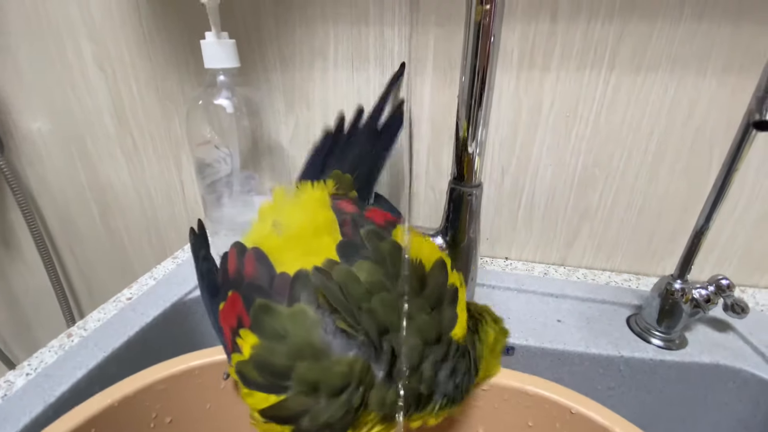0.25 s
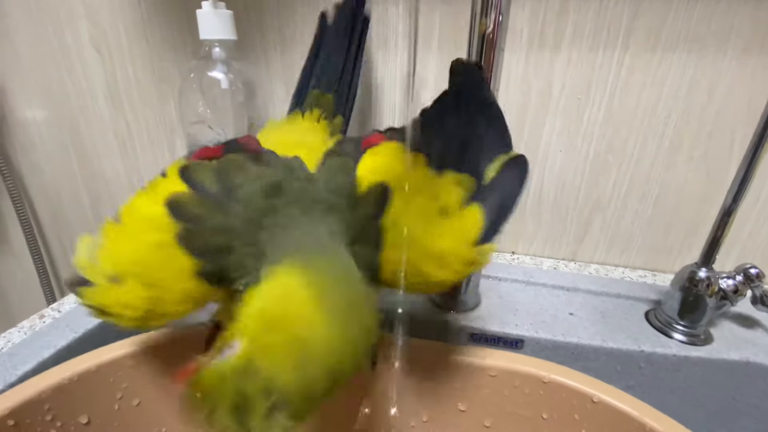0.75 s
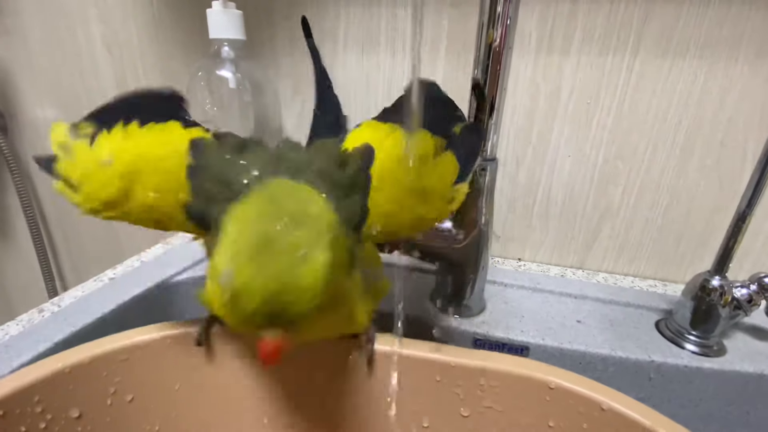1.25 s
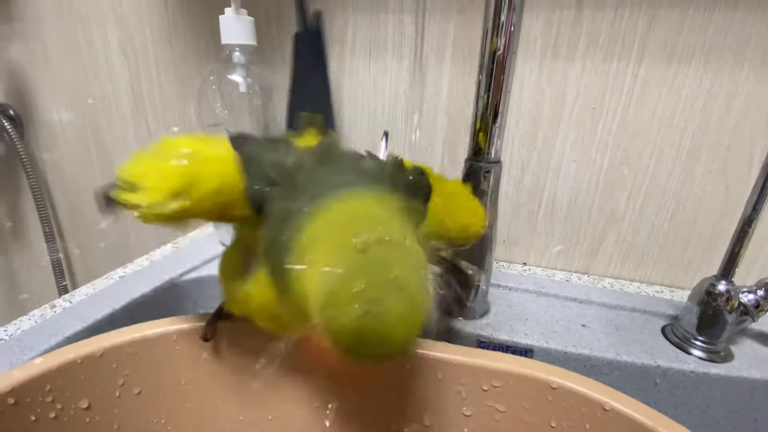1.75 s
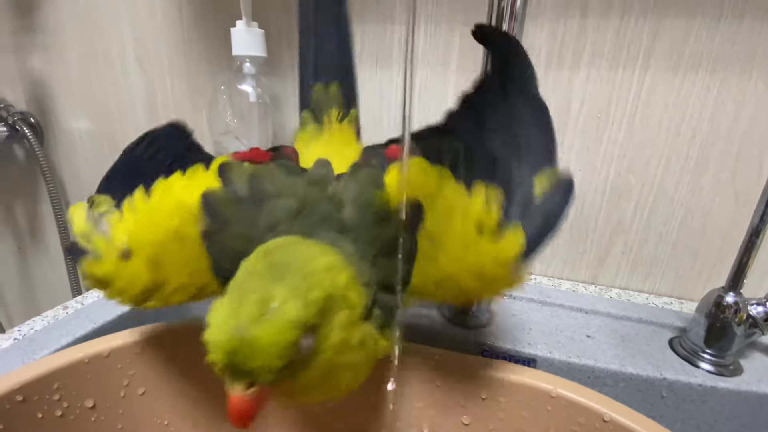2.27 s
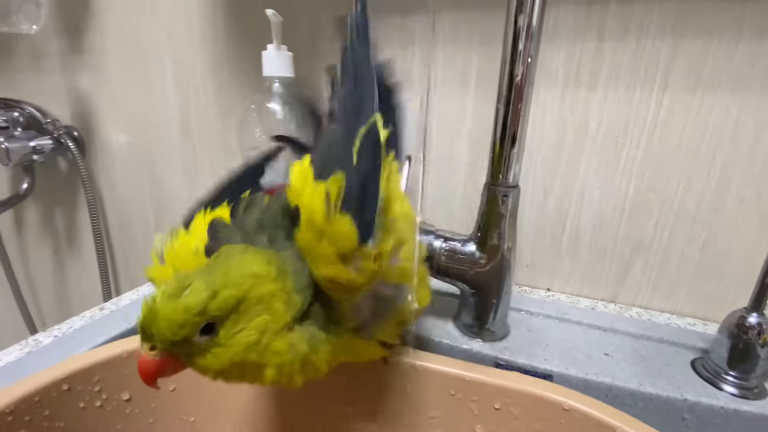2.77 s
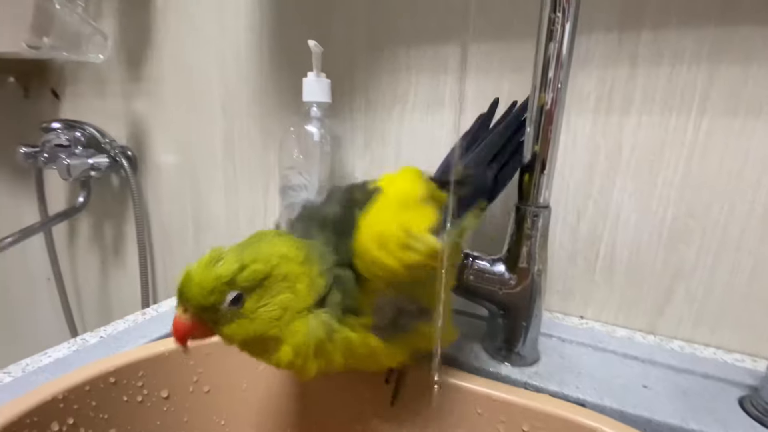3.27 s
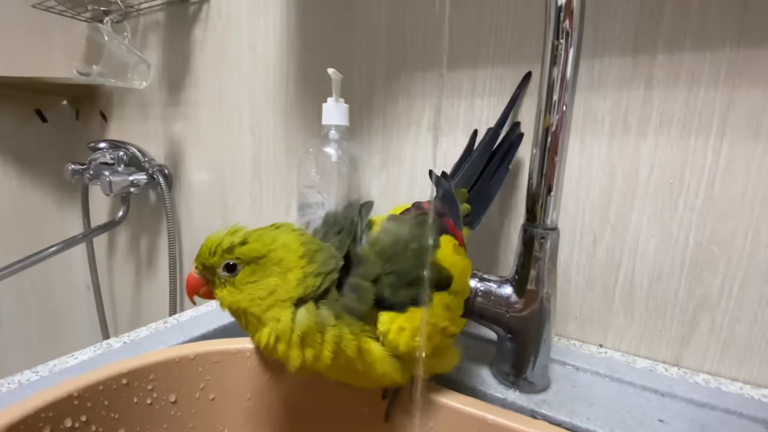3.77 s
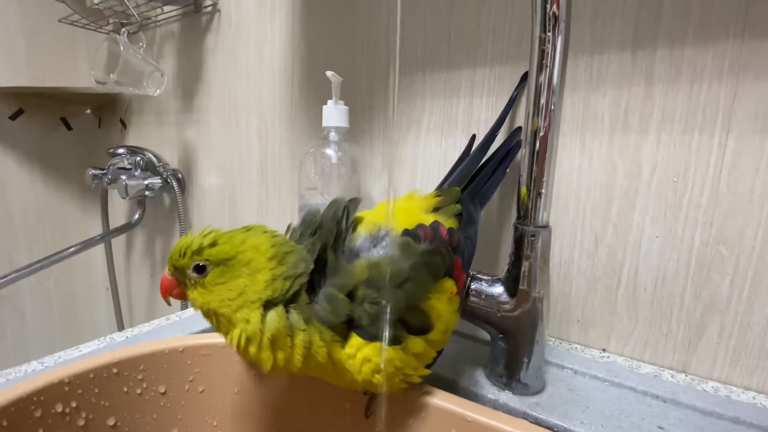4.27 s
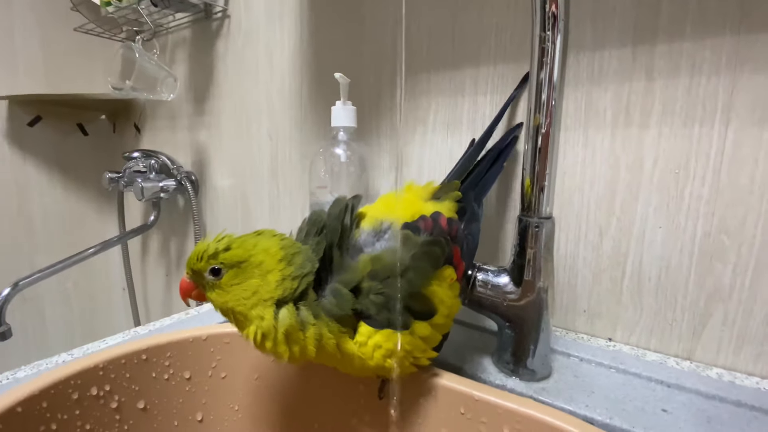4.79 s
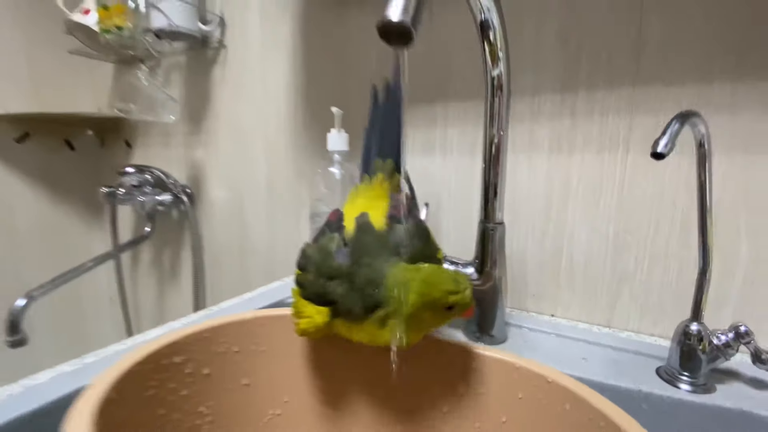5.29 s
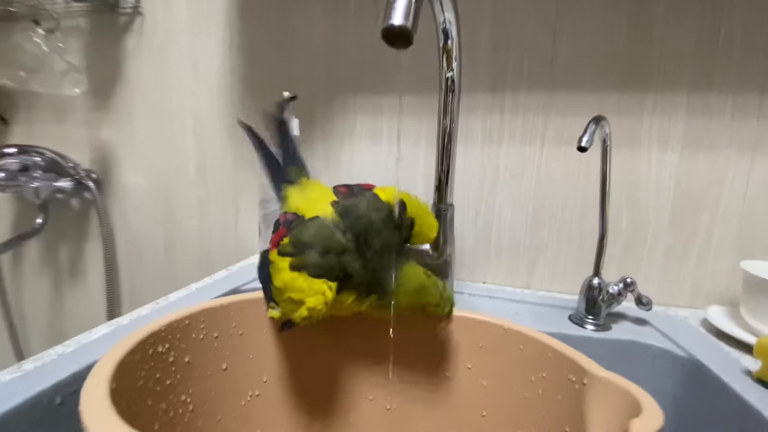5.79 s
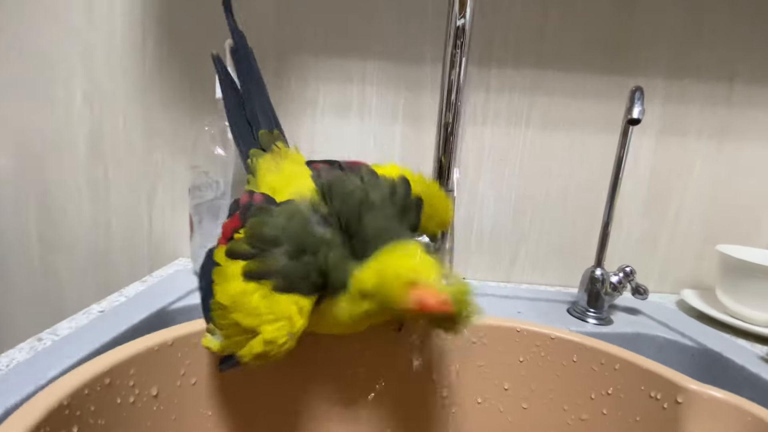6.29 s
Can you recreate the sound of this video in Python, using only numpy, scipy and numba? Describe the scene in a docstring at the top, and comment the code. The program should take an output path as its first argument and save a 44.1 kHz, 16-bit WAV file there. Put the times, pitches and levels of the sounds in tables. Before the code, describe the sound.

Close, uneven trickling and plopping of water falling off a bathing bird into a plastic bucket in a kitchen sink.

```python
"""In a kitchen sink, a thin tap stream breaks on a bathing bird and drips into a plastic bucket.
Each impact on the water radiates a tick; trapped air bubbles ring as damped oscillators whose pitch
climbs as they near the surface. Heavy drops excite the modes of the bucket wall, and fine spray
patters between them over the resonant hum of the sink. The sound is heard from close by at two
ports, left and right, with a short echo from the tiles and a soft room background."""
import sys
import numpy as np
from scipy import signal
from scipy.fft import rfft, irfft
from scipy.io import wavfile
from scipy.ndimage import uniform_filter1d, map_coordinates
from numba import njit

SR = 44100
rng = np.random.default_rng(int(sys.argv[2]) if len(sys.argv) > 2 else 0)


def digitize_waveform(pressure):
    """Quantize a signal to 16-bit integers and store it at the path in sys.argv[1].

    Rows of a 2-D input are taken as channels; values are limited to [-1, 1].
    """
    field = np.atleast_2d(pressure).T
    bounded = np.clip(field, -1, 1)
    quanta = np.round(bounded * 32767).astype(np.int16)
    wavfile.write(sys.argv[1], SR, quanta)


N = 288414

# Spectral density of the room background: f/Hz, relative level/dB
ROOM_SPECTRUM = [(30, -26), (52, 15.5), (343, -5.5), (665, -5.5), (11000, -17), (15500, -10.5),
                 (16800, -38)]
# Resonances of the sink, lowest first: f/Hz, bandwidth/Hz, relative level/dB
SINK_MODES = [(62, 27.5, -0.5), (141, 37, -23.5), (233.5, 24, -34.5), (357.3, 106, -25.5)]
# Envelope of the lowest sink resonance: t/s, level/dB
HUM_ENVELOPE = [(0.0, -54.5), (3.24, -54), (6.54, -66)]
# Envelopes of the small drops: t/s, relative gurgle level/dB, relative patter level/dB
SPRAY_ENVELOPES = [(0.0, -26, -50.5), (0.29, -47, -51.5), (0.6, -35.5, -45), (0.84, -56.5, -60.5),
                   (1.0, -36, -47.5), (1.15, -53.5, -62), (1.36, -56, -59.5), (1.56, -46.5, -44.5),
                   (1.78, -56.5, -62), (2.2, -60, -59.5), (2.5, -36, -45.5), (2.89, -60, -53.5),
                   (3.24, -36.5, -46.5), (3.56, -46.5, -60.5), (3.82, -40.5, -48.5), (4.22, -38, -42.5),
                   (4.62, -46.5, -62.5), (5.05, -47.5, -47.5), (5.4, -57.5, -62), (5.55, -42.5, -51),
                   (5.85, -35.5, -48), (6.03, -52.5, -61), (6.2, -55.5, -54), (6.35, -57.5, -57.5)]
# Large bubbles floating up: t/s, peak level/dB, first f/Hz, last f/Hz, duration/s
RISING_BUBBLES = [(0.032, -28, 973, 2420, 0.017), (0.065, -24.5, 910, 2272, 0.013),
                  (0.175, -36.5, 1310, 2140, 0.013), (0.226, -33.5, 1120, 2040, 0.0116),
                  (0.302, -32.5, 716.4, 2203, 0.0099), (0.424, -38.5, 1280, 2940, 0.015),
                  (0.465, -33.5, 714.5, 1422, 0.016), (0.598, -32, 792, 1470, 0.027),
                  (1.397, -36, 585, 1430, 0.033), (1.435, -30.5, 1160, 2208, 0.0084),
                  (1.473, -36, 705, 1420, 0.014), (1.491, -28, 1272, 2386, 0.0083),
                  (1.524, -38, 890, 1274, 0.026), (1.602, -28, 1061, 2586, 0.0077),
                  (1.688, -39.5, 1087, 1724, 0.034), (3.023, -33, 1200, 2210, 0.0069),
                  (3.09, -24.5, 1160, 2640, 0.024), (3.334, -37, 1327, 2062, 0.011),
                  (3.4, -29, 1011, 1997, 0.0075), (3.834, -32, 1028, 1870, 0.011),
                  (3.991, -34, 914, 1940, 0.01566), (4.147, -25.5, 797, 2378, 0.013),
                  (4.621, -36, 1260, 2940, 0.0094), (4.73, -25, 1770, 2700, 0.015),
                  (4.912, -35, 2660, 3580, 0.009), (5.477, -32.5, 1533, 2430, 0.0033),
                  (5.65, -38.5, 638.6, 1357, 0.046), (6.154, -39, 550, 1420, 0.018)]
# Drops striking the water: t/s, crack level/dB, body level relative to the crack/dB
SURFACE_IMPACTS = [(0.0712, -21, -7.5), (0.246, -30, 7), (0.3267, -17, -14.5), (0.547, -29.5, 5),
                   (0.574, -23.5, -33), (0.624, -34.5, 17.5), (0.652, -37.5, 18), (0.6974, -14.5, -32),
                   (0.889, -16, -13), (0.943, -36, 4.5), (0.967, -27.5, -8.5), (1.035, -22.5, -28),
                   (1.5403, -30, 9), (1.5718, -17.5, -35), (2.2105, -29, -3), (2.286, -22, -9),
                   (2.309, -17, -43), (2.395, -23, -27), (2.6438, -20, -4), (2.6984, -16.5, -4.5),
                   (2.805, -19.5, -6.5), (2.916, -20, 2), (2.988, -23.5, -30), (3.038, -17.5, -12),
                   (3.089, -14.5, -10), (3.2644, -7.5, -22.5), (3.335, -29, -2), (3.4122, -20, -8),
                   (3.489, -25, -18), (3.526, -22, 4), (3.5726, -24, -5.5), (3.6065, -22.5, -6),
                   (3.6511, -17.5, -49), (3.715, -22, 1.5), (3.7945, -15.5, -5.5), (3.86, -39, 20),
                   (3.98, -25.5, 0), (4.0254, -34, 13), (4.245, -38, -1), (4.395, -20.5, -7),
                   (4.4762, -24, -37), (4.5029, -23, -1.5), (4.575, -16.5, -6), (4.646, -22.5, -8),
                   (4.749, -23.5, -8), (4.759, -17, -40), (4.784, -12.5, -36.5), (4.8567, -9, -21),
                   (4.882, -20, -29), (4.95, -32.5, 18.5), (4.995, -39.5, 17), (5.053, -18.5, -32),
                   (5.1709, -18, -5.5), (5.2144, -28, -14), (5.256, -29, -23.5), (5.505, -21, -5),
                   (5.597, -41, 14.5), (5.658, -25.5, -3), (5.7198, -33, 7), (6.121, -28, -39),
                   (6.141, -17.5, -48), (6.1996, -12.5, -6.5), (6.249, -32, 4.5)]
# Bubbles trapped by drops: t/s, peak level/dB, starting f/Hz, rise/(octaves per decay time)
TRAPPED_BUBBLES = [(0.0819, -29.5, 1150, 0.28), (0.0854, -30, 790, 0.3), (0.1352, -16.5, 1238, 0.95),
                   (0.137, -25.5, 3490, 0), (0.2126, -21, 1354, 0.39), (0.3281, -18, 3540, 0.22),
                   (0.366, -24, 1867, 0.22), (0.3741, -20.5, 2930, 0.42), (0.512, -21.5, 1496, 0.12),
                   (0.6289, -20, 3260, 0.14), (0.719, -22, 785, 0.72), (0.7366, -22, 1137, 0.17),
                   (0.8933, -22, 3240, 0.25), (0.997, -20.5, 1380, 0.33), (1.441, -22.5, 2155, 1),
                   (1.502, -28.5, 687, 0.055), (1.5426, -28, 4140, 0.53), (1.568, -17.5, 1295, 0.098),
                   (1.6162, -17, 2770, 0.165), (1.615, -17.5, 4450, 0), (1.6721, -17, 1116, 0.027),
                   (2.356, -27.5, 3192, 0.0092), (2.4, -20.5, 1884, 0.054), (2.458, -30, 1920, 0),
                   (2.49, -28, 1467, 0.85), (2.705, -33.5, 643, 0.16), (2.766, -34.5, 926, 0.46),
                   (2.8089, -23, 1186, 0.15), (2.826, -18.5, 3870, 0.67), (2.9952, -27, 1190, 0.085),
                   (3.034, -13, 2875, 0.37), (3.04, -19, 1510, 0.29), (3.0907, -20.5, 3635, 0.089),
                   (3.091, -31, 5100, 0), (3.114, -26.5, 1250, 0.26), (3.138, -19, 1623, 0.08),
                   (3.1504, -16, 4610, 0.086), (3.4228, -13.5, 5100, 0), (3.4533, -25, 711, 0.13),
                   (3.455, -20.5, 1380, 0.032), (3.523, -21, 4210, 0.22), (3.487, -33, 2180, 0.0088),
                   (3.528, -20.5, 1408, 0.15), (3.6198, -25.5, 3880, 0.16), (3.6256, -31, 617, 0.19),
                   (3.677, -30, 1572, 0.16), (3.7159, -26, 588.7, 0.1), (3.773, -30, 1437, 0.24),
                   (3.794, -33.5, 1188, 0.13), (3.8603, -22.5, 1310, 0.16), (3.902, -29, 1450, 0),
                   (3.919, -31.5, 965, 0.075), (3.9519, -22.5, 2494, 0.21), (3.9576, -30, 694, 0.12),
                   (4.083, -29, 1556, 0.16), (4.108, -35.5, 833, 0.024), (4.254, -27, 1051, 0.44),
                   (4.2718, -33.5, 570.3, 0.075), (4.3145, -31, 1565, 0), (4.3408, -23, 897, 0.32),
                   (4.4133, -21.5, 1126, 0.87), (4.502, -28.5, 4900, 0.17), (4.5334, -16, 833, 0),
                   (4.5769, -21.5, 1154, 0.36), (4.608, -20.5, 749, 0), (4.6115, -23.5, 1363, 0.044),
                   (4.695, -18.5, 1158, 0.2), (4.7051, -20, 1660, 0.32), (4.724, -16, 1580, 0.11),
                   (4.855, -15.5, 2632, 0.046), (4.949, -15.5, 4600, 0.39), (5.086, -25, 3050, 0.017),
                   (5.1108, -20.5, 1420, 0.38), (5.134, -16, 1262, 0.19), (5.172, -27, 1490, 0.094),
                   (5.309, -35, 1108, 0.041), (5.47, -31.5, 1528, 0.2), (5.5125, -23, 1002, 0.0093),
                   (5.599, -27, 608, 0.0021), (5.686, -17, 1460, 0), (5.761, -28, 3680, 0.098),
                   (5.82, -23, 1701, 0.092), (5.85, -29.5, 2040, 0.079), (5.93, -36.5, 1460, 0.11),
                   (6.1812, -24, 1370, 0.079), (6.19, -16, 2640, 0.25), (6.198, -22, 4700, 0.039),
                   (6.2494, -16.5, 723, 0.077)]
# Heavy drops striking the bucket: t/s, relative level/dB
WALL_IMPACTS = [(0.084, -23.5), (0.242, -35.5), (0.403, -28.5), (0.489, -25), (0.721, -33), (0.991, -37),
                (1.172, -34), (1.405, -32), (1.499, -29.5), (1.567, -34.5), (1.672, -33), (1.866, -34),
                (3.252, -26.5), (3.526, -32), (3.622, -31), (3.714, -32), (3.795, -36), (3.955, -38),
                (4.267, -26.5), (4.535, -28), (4.785, -30), (4.938, -28.5), (5.152, -32.5), (5.517, -23),
                (5.595, -42.5), (6.098, -36.5), (6.252, -20.5)]
# Modes of the bucket wall: f/Hz, gain/dB, T60/s
WALL_MODES = [(135, -24, 0.49), (357, -5, 0.13), (411, -6.5, 0.015), (564.4, -4, 0.1), (725, -9.5, 0.12),
              (1205.4, -2.5, 0.059), (2156, -12, 0.052)]
# Level difference between the ports: f/Hz, left minus right/dB
PORT_BALANCE = [(60, 7.5), (110, -7.5), (200, 11), (380, 9.5), (700, 4), (1290, -0.5), (2380, 1.5),
                (4400, 6.5), (8120, 2.5), (15000, -2)]
# Phase difference between the ports: f/Hz, lead of the left/rad
PORT_PHASE = [(60, 0.76), (150, -1), (300, 0.4), (440, -2.0), (620, -2), (900, -1.73), (1470, -1.33),
              (1750, 1.16), (2100, 1), (3500, 1.72), (5000, 1.44), (9900, 1.5), (11800, -0.36), (15000, -3)]
# Frequency response of the microphone: f/Hz, gain/dB
MIC_RESPONSE = [(36, -4), (55, 1), (2150, 1), (2450, -1), (2800, 1), (5000, 5), (9300, 0.5), (11000, 5.5),
                (13000, -2.5), (15000, 3.5)]

TIME_S = np.arange(N) / SR
BIN_HZ = np.maximum(np.arange(N // 2 + 1) * SR / N, 1.)


def undb(db):
    """Amplitude ratio of a level in decibels."""
    return 10 ** (np.asarray(db) / 20)


def at_rms(x, db):
    """Normalisation to an rms level."""
    return x * undb(db) / np.sqrt(np.mean(x ** 2))


def envelope(table, column=1):
    """Gain per sample, by interpolation of a dB column over time."""
    rows = np.array(table)
    return undb(np.interp(TIME_S, rows[:, 0], rows[:, column]))


def per_bin(table):
    """Interpolation of (f/Hz, value) rows over log frequency."""
    hz, value = np.transpose(table)
    return np.interp(np.log(BIN_HZ), np.log(np.maximum(hz, 1)), value)


def filtered(x, response):
    """Linear filtering: the spectrum times a frequency response."""
    return irfft(rfft(x) * response, N)


def resonance(hz, width_hz):
    """Response of a damped oscillator, with unit gain at its centre."""
    return 1 / (1 + 1j * (BIN_HZ ** 2 - hz ** 2) / (BIN_HZ * width_hz))


def wander(rate_hz):
    """Slow noise: random steps smoothed by two moving averages."""
    hold = int(SR / rate_hz)
    steps = np.repeat(rng.standard_normal(N // hold + 1), hold)
    return 5.02 * uniform_filter1d(uniform_filter1d(steps, hold), hold)[:N]


def impulses(t, gain):
    """An impulse train with the given times and weights."""
    return np.bincount((t * SR).astype(int), gain, N)[:N]


def bursts(t, gain, decay_s, rise_s=0.00013):
    """Noise transients with exponential attack and decay."""
    fall, rise = np.exp(-1 / (decay_s * SR)), np.exp(-1 / (rise_s * SR))
    amplitude = signal.lfilter([1 - rise], np.convolve([1, -fall], [1, -rise]), impulses(t, gain))
    return amplitude * rng.standard_normal(N)


def room_background():
    """A diffuse field: soft, wavering noise, uncorrelated between left and right."""
    noise = filtered(rng.standard_normal((2, N)), undb(per_bin(ROOM_SPECTRUM)))
    return at_rms(noise, db=-56.5) * undb(0.8 * wander(rate_hz=4.64))


def sink_hum(splashes, window_s=0.033):
    """Noise-driven resonance: the lowest mode hums on, the upper ones follow the splash power."""
    power = np.maximum(uniform_filter1d(splashes ** 2, int(window_s * SR)), 1e-12)
    shake = np.sqrt(power) ** 0.39
    lowest, *upper = (at_rms(filtered(rng.standard_normal(N), resonance(hz, width) ** 2), db)
                      for hz, width, db in SINK_MODES)
    return envelope(HUM_ENVELOPE) * lowest + at_rms(shake, db=-29.5) * sum(upper)


def agitation(settle_s=0.019, reference_db=-17.5):
    """Relaxation: each large drop stirs the pool, which settles exponentially to its rest value, 1."""
    t, db = np.transpose([row[:2] for row in TRAPPED_BUBBLES + SURFACE_IMPACTS])
    kicks = impulses(t, undb(db - reference_db))
    return 1 + signal.lfilter([1], [1, -np.exp(-1 / (settle_s * SR))], kicks)


def spray(count=1400, gurgle_spread_db=3.0, patter_spread_db=6.5):
    """Secondary droplets: random bubbles and ticks, densest just after a large drop throws them up."""
    bubble_draw, size, pitch, rise, tick_draw, body, damping = rng.random((count, 7)).T
    stirred = agitation()
    cumulative_chance = np.cumsum(stirred ** 2) / np.sum(stirred ** 2)
    bubble_t, tick_t = np.interp([bubble_draw, tick_draw], cumulative_chance, TIME_S)
    size = -np.log(1 - 0.96 * size)  # truncated exponential distribution
    hz = 600 * 2 ** (2.2 * pitch ** 1.2)
    decay_s = (1.89 + 7.27 * damping ** 3) / hz  # small bubbles are high and short
    bubbles = plops(bubble_t, undb(gurgle_spread_db * size), hz, 0.55 * rise ** 2, decay_s)
    tick_gain = undb(patter_spread_db * size)
    ticks = slaps(tick_t, tick_gain, tick_gain * body, tilt_spread_db=5.5)
    gurgle = envelope(SPRAY_ENVELOPES, column=1) * at_rms(bubbles, db=-4)
    patter = envelope(SPRAY_ENVELOPES, column=2) * at_rms(ticks, db=1)
    return stirred ** 0.3 * (gurgle + patter)


@njit
def bubble_tones(rows, burst_octaves):
    """Minnaert resonance: a damped sine glides up as its bubble nears the surface, then bursts."""
    out = np.zeros(N)
    for t, gain, first_hz, rise, decay_s in rows:
        phase, start = 0., int(t * SR)
        for i in range(min(int(7 * decay_s * SR), N - start)):
            age = i / (decay_s * SR)  # in decay times
            hz = first_hz * 2 ** (rise * age)
            if hz > .2 * SR:
                break
            phase += 2 * np.pi * hz / SR
            amplitude = 2.1 * (1 - np.exp(-3 * age)) * np.exp(-age)  # peaks near 1
            burst_fade = np.exp(-(rise * age / burst_octaves) ** 4)
            out[start + i] += gain * amplitude * burst_fade * np.sin(phase)
    return out


def wall_flutter(x, flutter_db=4.0):
    """Modulation: the restless wall of a bubble makes its pitch and level waver."""
    gain = undb(flutter_db * np.tanh(wander(rate_hz=700) / 3))
    warped_index = np.arange(N) + 0.7 * wander(rate_hz=300)
    return gain * map_coordinates(x, [warped_index], order=1)


def plops(t, gain, hz, rise, decay_s):
    """Air entrainment: each ringing bubble is born in a wet splat of noise."""
    splat = bursts(t, gain, decay_s=0.0059) + bursts(t, undb(-7) * gain, decay_s=0.0098, rise_s=0.0042)
    tones = bubble_tones(np.transpose([t, gain, hz, rise, decay_s]), burst_octaves=2.0)
    return wall_flutter(tones) + filtered(splat, undb(-4) * resonance(1700, 870))


def slaps(t, crack_gain, body_gain, tilt_spread_db):
    """Impact radiation: a bright crack, with a tiny bubble and a collapsing droplet crown as body."""
    tilt = undb(tilt_spread_db * rng.standard_normal(len(t)))
    pitch = rng.random(len(t))
    hz = 2700 * 2 ** (1.2 * pitch)
    tiny_bubbles = np.transpose([t, undb(-2) * body_gain, hz, 0.55 * pitch, 3.44 / hz])
    crown = bursts(t, undb(-1.5) * body_gain, decay_s=0.002, rise_s=0.0036)
    out = bubble_tones(tiny_bubbles, burst_octaves=2.9)
    out += filtered(crown, undb(5.5) * resonance(3430, 3700))
    for band_hz, width_hz, weight in ((7160, 1770, 1 / tilt), (10900, 3600, tilt),
                                      (14100, 1360, undb(-1) * tilt)):
        crack = bursts(t, weight * crack_gain, decay_s=0.00031, rise_s=0.0012)
        tail = bursts(t, undb(-5.5) * weight * crack_gain, decay_s=0.0019, rise_s=0.00029)
        out += filtered(crack + tail, resonance(band_hz, width_hz))
    return out


def glugs(bend=1.42):
    """Rising resonance: a large bubble floats up, its tone swelling and fading as the pitch climbs."""
    out = np.zeros(N)
    for t, db, first_hz, last_hz, duration_s in RISING_BUBBLES:
        progress = np.linspace(0, 1, max(int(duration_s * SR), 8))
        hz = first_hz * (last_hz / first_hz) ** (progress ** bend)
        chirp = np.sin(2 * np.pi * np.cumsum(hz) / SR)
        out[int(t * SR):][:len(chirp)] += undb(db) * np.sin(np.pi * progress) * chirp
    return wall_flutter(out)


def surface_impacts():
    """Impact transients of the large drops slapping the water."""
    t, db, body_db = np.transpose(SURFACE_IMPACTS)
    return slaps(t, undb(db), undb(db + body_db), tilt_spread_db=2.5)


def trapped_bubbles(decay_cycles=2.27, quiet_below_db=-24.5):
    """Free oscillation of the air trapped by large drops; low and quiet bubbles decay more slowly."""
    t, db, hz, rise = np.transpose(TRAPPED_BUBBLES)
    lengthening = undb(1.43 * np.clip(quiet_below_db - db, 0, 5))
    decay_s = (0.00046 + decay_cycles / hz) * lengthening
    return plops(t, undb(db), hz, rise, decay_s)


def bucket(splashes, force_db=25, thump_db=-22, thump_decay_s=0.064):
    """Forced vibration: knocks and splashes drive the wall modes; each knock also thumps the sink."""
    t, db = np.transpose(WALL_IMPACTS)
    strength = undb(db + force_db)
    upper_share = rng.random(len(t))  # where a drop lands decides how hard it drives the upper modes
    sharp = bursts(t, strength * upper_share, decay_s=0.005, rise_s=0.00081)
    dull = bursts(t, strength * (1 - upper_share / 2), decay_s=0.0097, rise_s=0.0031)
    knocks = filtered(sharp, resonance(730, 510)) + filtered(dull, resonance(310, 600))
    force = knocks + undb(4.5) * splashes
    wall = sum(undb(mode_db) * filtered(force, resonance(hz, np.log(1000) / (np.pi * t60_s)))
               for hz, mode_db, t60_s in WALL_MODES)
    sink_hz = SINK_MODES[0][0]
    thump = np.sin(2 * np.pi * sink_hz * TIME_S) * np.exp(-TIME_S / thump_decay_s)
    return wall + signal.fftconvolve(impulses(t, undb(db + thump_db)), thump)[:N]


def tile_echo(x, t60_s=0.11, build_s=0.011, wet_db=-13):
    """Reverberation: reflections from basin and tiles form a short, separate tail at each port."""
    t = np.arange(int(.3 * SR)) / SR
    decay = np.exp(-np.log(1000) * t / t60_s) * np.minimum(t / build_s, 1)
    tail = rng.standard_normal((2, len(t))) * decay
    tail *= undb(wet_db) / np.sqrt(np.sum(tail ** 2, axis=1, keepdims=True))
    return signal.fftconvolve(x[None], tail, axes=1)[:, :N]


def scene():
    """Superposition at two ports, each with its own colour; the paths shift as landing points vary."""
    splashes = trapped_bubbles() + glugs() + surface_impacts() + spray()
    direct = splashes + bucket(splashes)
    shift_samples = 0.07 * wander(rate_hz=25) * np.array([[1], [-1]])
    near = map_coordinates(direct, [np.arange(N) + shift_samples], order=3) + sink_hum(splashes)
    left = undb(per_bin(PORT_BALANCE) / 2) * np.exp(.5j * per_bin(PORT_PHASE))
    right = 1 / left
    return filtered(near, np.array([left, right])) + tile_echo(splashes) + room_background()


def record(dry, cutoff_hz=16300):
    """Transduction: the microphone's frequency response, then a steep low-pass."""
    coloured = filtered(dry, undb(per_bin(MIC_RESPONSE)))
    return signal.sosfilt(signal.ellip(10, .2, 80, cutoff_hz, fs=SR, output="sos"), coloured)


dry = scene()
out = record(dry)
digitize_waveform(out)
```